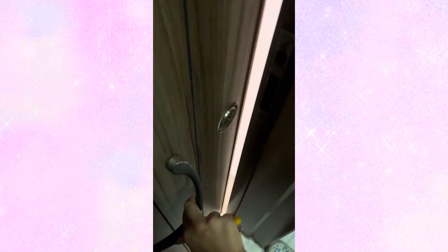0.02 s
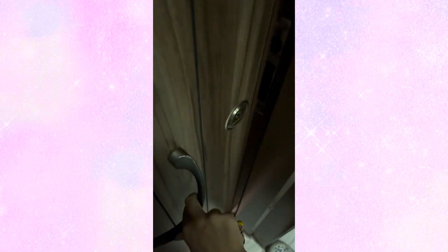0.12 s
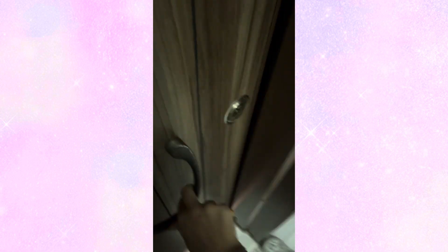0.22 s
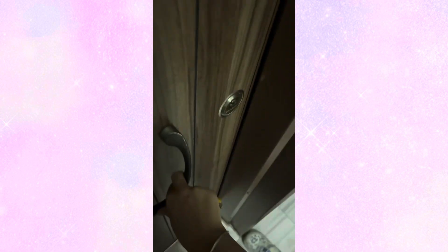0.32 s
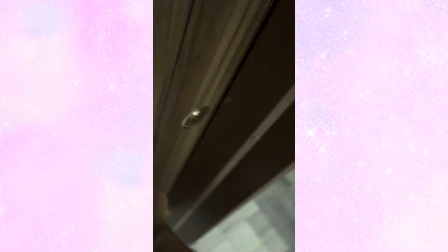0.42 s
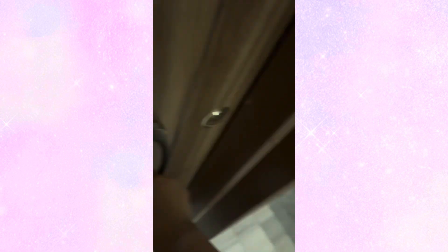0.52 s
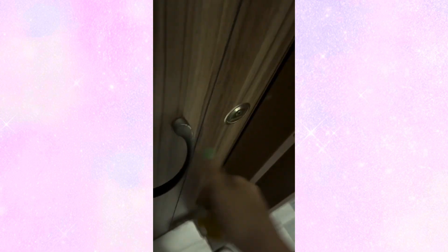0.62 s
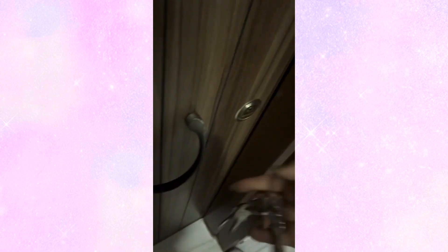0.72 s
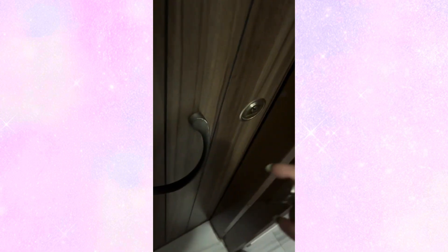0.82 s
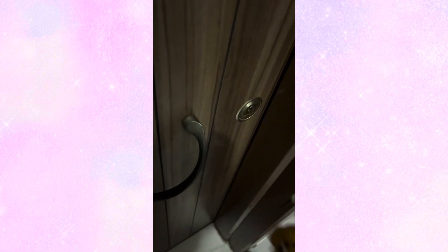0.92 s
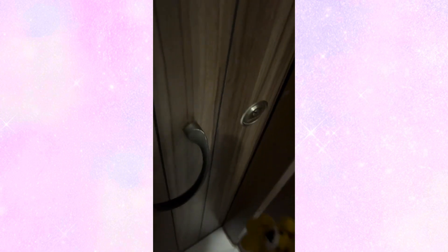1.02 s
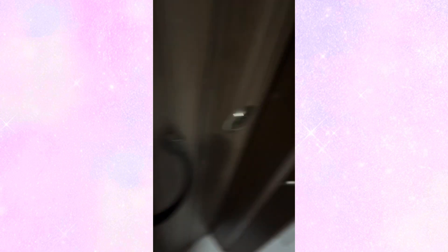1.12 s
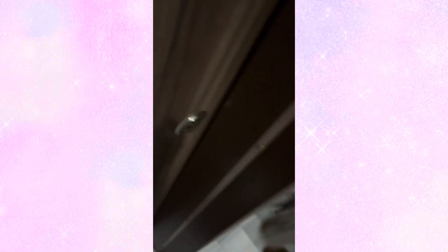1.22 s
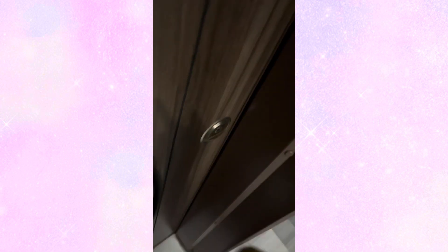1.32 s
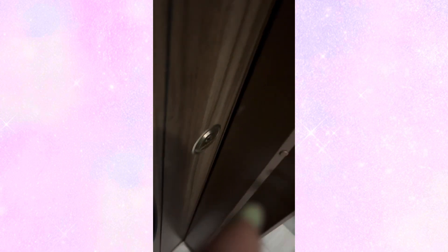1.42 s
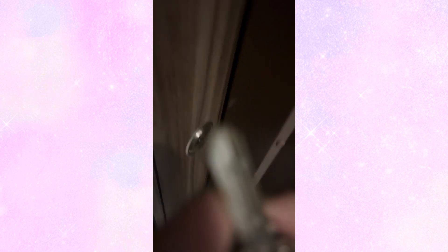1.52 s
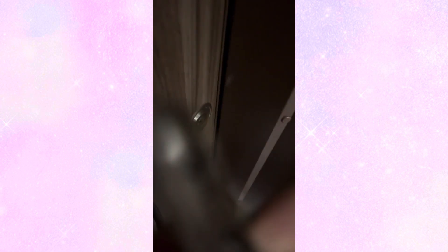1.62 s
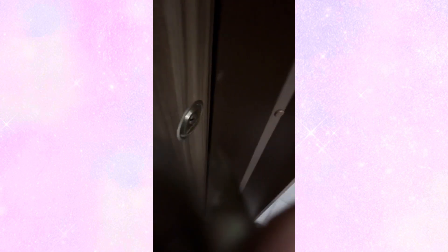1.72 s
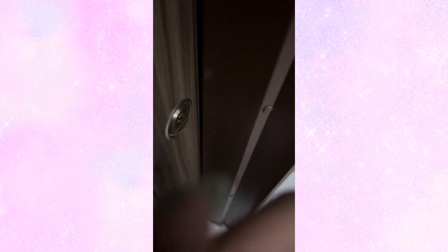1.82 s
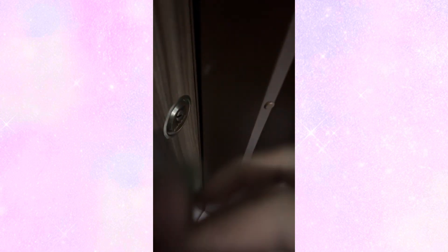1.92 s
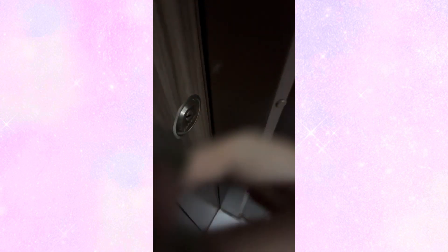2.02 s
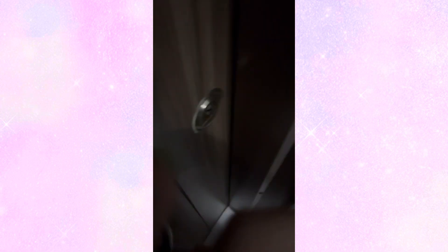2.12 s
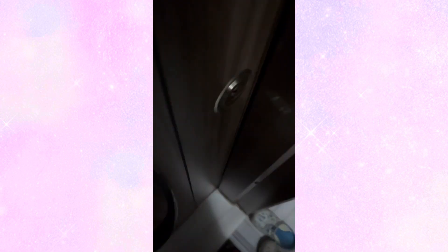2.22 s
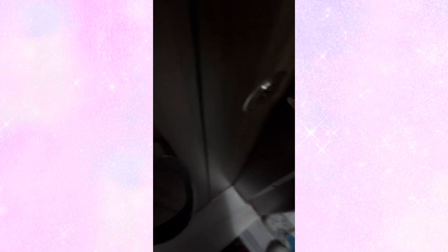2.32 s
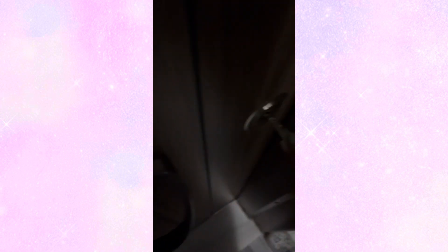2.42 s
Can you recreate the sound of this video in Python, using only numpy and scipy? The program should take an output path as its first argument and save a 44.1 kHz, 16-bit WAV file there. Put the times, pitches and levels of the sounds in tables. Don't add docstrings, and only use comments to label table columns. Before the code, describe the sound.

Door pulled shut in three quick clunking blows, echoing, followed by close keys clinking and ticking

```python
import sys
import numpy as np
from scipy import signal
from scipy.fft import rfft, irfft
from scipy.io import wavfile

SR = 44100
rng = np.random.default_rng(int(sys.argv[2]) if len(sys.argv) > 2 else 0)


def gain_from_db(level_db):
    decades = np.asarray(level_db, float) / 20
    return 10 ** decades


def int16_out(signal):
    q = np.round(np.clip(np.atleast_2d(signal).T, -1, 1) * 32767)
    wavfile.write(sys.argv[1], SR, q.astype(np.int16))


N = 110250
T = np.arange(N) / SR
OPPOSITE = np.array([[1], [-1]])

# frequency in Hz, density in dB per Hz.
AIR_SPECTRUM = [(25, 0), (45, 4), (150, 5.5), (460, -7), (900, -10.5), (2900, -7.5), (6500, -12),
                (16000, -20)]
# centre in seconds, length in seconds, level in dB, centre in Hz.
RUSTLES = [(0.141, 0.1, -53, 1306), (0.877, 0.29, -62, 601.9), (0.92, 0.082, -58, 240),
           (1.101, 0.083, -60.5, 1290), (1.295, 0.21, -61.5, 3400), (1.661, 0.16, -57.5, 3200),
           (1.675, 0.035, -55, 685), (1.733, 0.044, -58.5, 980), (1.961, 0.055, -47, 1300),
           (1.959, 0.092, -56.5, 3500), (2.007, 0.19, -58, 710), (2.06, 0.28, -56.5, 2240)]
# start in seconds, level in dB, pitch in Hz.
CASE_BUMPS = [(0.117, -57.5, 33.7), (0.655, -42, 128), (0.768, -55.5, 48.6), (1.03, -55, 72.7),
              (1.257, -53, 87), (1.27, -49, 70.0), (1.298, -49, 57.3), (1.368, -64, 32.5),
              (1.697, -52.5, 96), (1.823, -54, 91.5), (1.92, -45, 117), (1.928, -32, 85), (1.94, -41, 80),
              (1.996, -38.5, 61.6), (2.03, -51, 32.8), (2.067, -54.5, 72), (2.119, -54.5, 64),
              (2.288, -72, 119)]

# time in seconds, level in dB, scrape before it in seconds,
# rattle t60 in seconds, panel push in dB.
BLOWS = [
    (0.2107, -11, 0.026, 0.044, -11.5),
    (0.2795, -6, 0.00027, 0.062, -11),
    (0.403, -9.5, 0.032, 0.092, -12.5),
    (2.4426, -25.5, 0.0011, 0.025, -32.5),
]
# frequency in Hz, density in dB per Hz.
LATCH_SPECTRUM = [(240, -13), (450, -5.5), (2000, -7), (3300, -6.5), (6000, -11), (8400, -18),
                  (12500, -16.5), (16500, -34.5)]
# frequency in Hz, level in dB, t60 in seconds.
LATCH_RINGS = [(3278, -1.5, 0.046), (976, -8, 0.042), (1500, -10, 0.058), (950, -3, 0.015)]
# time in seconds, frequency in Hz, level in dB, t60 in seconds.
METAL_CRACKS = [(.2003, 4560, -23, 0.016), (.2065, 3257, -14.5, 0.027), (.2115, 2450, -15.5, 0.028),
                (.216, 1134, -14.5, 0.017), (.2815, 920, -13, 0.024), (.288, 4570, -22, .015),
                (.385, 3120, -30, 0.013), (.4018, 3580, -17, 0.0063), (.4035, 1500, -7, 0.012),
                (.4045, 4930, -11, 0.0089), (.4088, 480, -14.5, .008), (2.434, 2310, -43, 0.024),
                (2.4428, 2330, -21, 0.0095), (2.4432, 915, -20, 0.01), (2.4436, 3470, -30.5, 0.014),
                (2.4475, 1280, -25.5, 0.014), (2.452, 3200, -34, .01)]
# frequency in Hz, level in dB, t60 in seconds.
PANEL_MODES = [(206, -6, 0.18), (248.8, -2.5, 0.4), (265, -0.5, 0.27), (282, -11, 0.18), (293.6, -8, 0.48),
               (320, -5.5, 0.11), (341.4, -2.5, 0.23), (394, -8.5, 0.069), (432.3, -4.5, 0.16),
               (508, -9.5, 0.067), (650, -10, 0.099), (720, -11, 0.11)]
# frequency in Hz, level in dB, t60 in seconds.
FRAME_MODES = [(48.6, -23, 0.64), (70, -11, 0.22), (99, -10, 0.31), (124, -4, 0.34), (141, -11, 0.15),
               (178, -14.5, 1)]
# frequency in Hz, level in dB, t60 in seconds.
LEAN_MODES = [(99, -25, 0.31), (128, -6, 0.49), (182, 6, 0.15), (212, -7, 0.066), (267.3, 7.5, 0.12),
              (340, -13, 0.073), (471, -16, 0.79)]

# frequency in Hz, t60 in seconds.
HALL_T60 = [(60, 0.95), (300, 0.93), (1000, 1), (3500, 0.99), (8000, 0.44), (15000, 0.16)]
# frequency in Hz, level in dB, t60 in seconds.
STANDING_WAVES = [(149.7, -30.5, 0.85), (227.8, -39.5, 1.53), (252.3, -36, 0.82), (275.3, -33, 1.12)]

# start in seconds, level in dB, long key share from 0 to 1, contact in seconds.
CHINKS = [(0.637, -44.5, 0.9, 0.034), (0.771, -36.5, 0.66, 0.023), (0.6568, -48.5, 0.4, .01),
          (0.8255, -35, 0.2, 0.002), (0.838, -44, 0.4, 0.0033), (1.0509, -35.5, 0.38, 0.0014),
          (1.07, -49, 0.25, 0.003), (.9, -58, 0.34, 0.031), (1.131, -53.5, 0.6, 0.078),
          (1.2, -54, 0.8, 0.047), (1.2595, -52.5, 0.2, .002), (1.294, -52.5, 0.65, .006),
          (1.5756, -55, 0.05, .005), (1.28, -44.5, 0.73, .03), (1.3381, -52, 0, 0.0064),
          (1.4756, -40, 0.74, 0.0054), (1.59, -43, 1, 0.009), (1.9082, -49.5, 0.8, 0.0086),
          (1.972, -27, 1, 0.017), (1.9988, -23, 0.6, 0.003), (2.008, -34, 0.8, .008),
          (2.019, -31, 0.4, 0.008), (2.0654, -24.5, 0.3, 0.006), (2.098, -37.5, 0.54, 0.0075),
          (2.1438, -34, 0.18, 0.011), (2.177, -26.5, 0.4, 0.0067), (2.196, -33, 0.7, 0.003),
          (2.215, -45, 0.9, 0.004), (2.236, -29, 0.2, 0.004), (2.287, -54, 0.1, 0.0087)]
# time in seconds, level in dB, contact in seconds.
TICKS = [(0.8265, -26.5, 0.009), (.839, -23.5, 0.0047), (0.97, -27, 0.0041), (1.0498, -51, 0.0014),
         (1.2595, -28, 0.0025), (1.3909, -29.5, 0.0088), (1.4741, -25, 0.0019), (1.5247, -37.5, 0.0042),
         (1.7299, -37.5, 0.0028), (1.8713, -31.5, 0.003), (1.899, -32, 0.0033), (1.882, -40.5, .015),
         (1.953, -41, 0.0095), (1.9298, -23, 0.0038), (1.977, -20.5, 0.0046), (1.9974, -13, 0.0013),
         (1.9718, -30, .004), (2.0655, -30, 0.0051), (2.1832, -29.5, 0.044), (2.2337, -18, 0.0011),
         (2.237, -22, 0.011), (2.288, -32, 0.002), (1.598, -28, 0.0027)]
# frequency in Hz, density in dB per Hz.
TICK_SPECTRUM = [(1000, -21), (3000, -16), (5000, -6.5), (9000, -8.5), (12500, 3.5), (15500, -7),
                 (17000, -16)]
# frequency in Hz, level in dB, t60 in seconds.
LONG_KEY_MODES = [(2164, -19, .06), (5109, -20, .1), (6514, -8, .11), (8845, -10, .12), (9150, -11, .08),
                  (10890, 2, .11), (13625, -4, .09), (14350, 7, .11)]
# frequency in Hz, level in dB, t60 in seconds.
SHORT_KEY_MODES = [(6560, -10, .06), (7615, -12, .09), (11650, 4, .06), (11750, -1, .05), (12400, -6, .04),
                   (13650, -8, .05), (14600, -3, .05), (15345, 2, .07)]
# time in seconds,
# loss in dB.
GRIPS = [(.7, 12), (.88, 4), (.965, 15), (1.085, 10), (1.32, 11), (1.39, 12), (1.5, 10), (1.64, 16),
         (1.925, 10), (2.031, -6.5), (2.11, -7), (2.165, 22), (2.201, 16)]

# frequency in Hz, width in Hz, gain in dB.
PORT_DIPS = [(5740, 180, -3.5), (9990, 320, -9), (14700, 180, -9.5)]


def curve(table, hz):
    table = np.array(table)
    return np.interp(np.log(hz + 1), np.log(table[:, 0]), table[:, 1])


def unit(x):
    return x / np.sqrt(np.mean(x ** 2))


def colour(x, table):
    ceps = irfft(np.log(gain_from_db(curve(table, np.linspace(0, SR / 2, 2049)))))
    ceps[1:2048] *= 2
    ceps[2049:] = 0
    h = irfft(np.exp(rfft(ceps)))
    return signal.fftconvolve(x, h / np.sqrt(np.sum(h ** 2)))[:N]


def butter(x, order, hz, kind):
    return signal.sosfilt(signal.butter(order, hz, kind, fs=SR, output="sos"), x)


def ring(x, hz, db, t60):
    pole = np.exp((2j * np.pi * hz - np.log(1000) / t60) / SR)
    return gain_from_db(db) * signal.lfilter([1], [1, -pole], x).imag


def burst(at, rise, t60):
    swell = (T - at) / max(rise, 1e-4) * 4.45
    decay = (at - T) / max(t60, 1e-3) * np.log(1000)
    return np.exp(np.where(T < at, swell, decay))


def grit(db):
    grains = np.repeat(rng.exponential(size=N // 16 + 1), 16)[:N]
    return unit(rng.standard_normal(N) * gain_from_db(db * grains))


def kicks():
    return np.sign(rng.standard_normal(N))


def background():
    mid, side = (colour(rng.standard_normal(N), AIR_SPECTRUM) for _ in range(2))
    side = butter(side, 1, [300, 4000], "band")
    out = gain_from_db(-61.5) * (mid + 1.4 * side * OPPOSITE)
    for s, length, db, hz in RUSTLES:
        spectrum = [(hz / 4, -18), (hz, 0), (hz * 3, -14), (20000, -60)]
        mid, side = (colour(grit(1.6), spectrum) for _ in range(2))
        swell = np.exp(-(2 * (T - s) / length) ** 2)
        out = out + gain_from_db(db) * swell * (mid + 1.5 * side * OPPOSITE)
    return out


def handling():
    thumps = 0
    for s, db, hz in CASE_BUMPS:
        envelope = burst(s + .5 / hz, .5 / hz, 2 * 0.52 / hz)
        thumps = thumps + gain_from_db(db + 12.5) * np.sin(2 * np.pi * hz * (T - s)) * envelope
    return thumps


def door():
    envelopes = [gain_from_db(db) * burst(s, scrape, t60) for s, db, scrape, t60, _ in BLOWS]
    rattles = grit(1.41) * np.array(envelopes)
    latch = .5 * colour(rattles.sum(axis=0), LATCH_SPECTRUM)
    latch = latch + 0.033 * sum(ring(x, *mode) for x, mode in zip(rattles, LATCH_RINGS))
    for s, hz, db, t60 in METAL_CRACKS:
        click = 1. * (np.arange(N) == int(s * SR))
        latch = latch + ring(click, hz, db, t60)

    rise_s, push_s = 0.0047, 0.019
    push = [gain_from_db(db) * burst(s + rise_s, rise_s, push_s) for s, _, _, _, db in BLOWS]
    seat = push[2] + gain_from_db(-16.5) * (push[0] + push[1])
    lean = gain_from_db(-29.5) * burst(2.384, 0.013, 0.055)
    boom = 0
    for force, modes in [(sum(push), PANEL_MODES), (seat, FRAME_MODES), (lean, LEAN_MODES)]:
        boom = boom + sum(ring(force * kicks(), *mode) for mode in modes)
    return latch + gain_from_db(-29.5) * boom


def walls(x):
    length_s, echoes = .04, 50
    taps = np.zeros((2, int(length_s * SR) + 1))
    for port in taps:
        at = rng.random(echoes)
        port[(at * length_s * SR).astype(int)] = rng.standard_normal(echoes) * gain_from_db(-20 * at) / 3
    return signal.fftconvolve(x[None], butter(taps, 1, 251, "high"), axes=1)[:, :N]


def hall(x):
    t, tail = T[:N // 2], 0
    for hz in 44 * 2. ** np.arange(9):
        noise = rng.standard_normal((2, len(t)))
        mid, side = butter(noise, 2, [hz / 2 ** .5, min(hz * 2 ** .5, 20000)], "band")
        width = min(hz / 700, 1) ** 0.77
        tail = tail + (mid + width * side * OPPOSITE) * gain_from_db(-60 * t / curve(HALL_T60, hz))
    onset_s = .006
    tail = tail * (1 - np.exp(-(t / onset_s) ** 2))
    return signal.fftconvolve(x[None], tail / np.sqrt(np.sum(tail ** 2) / 2), axes=1)[:, :N]


def stairwell():
    swell_s, waves = 0.028, 0
    for hz, db, t60 in STANDING_WAVES:
        envelope = burst(BLOWS[2][0] + swell_s, swell_s, t60)
        waves = waves + gain_from_db(db) * np.sin(2 * np.pi * hz * T) * envelope
    return waves


def ringing_keys():
    touch = []
    for s, db, _, contact in CHINKS:
        knock = burst(s + contact / 2, contact, 4 * contact) / np.sqrt(contact * SR)
        chatter = gain_from_db(-36) * burst(s, .02, .2)
        touch.append(gain_from_db(db) * (knock + chatter))
    touch = np.array(touch)

    share = np.clip(np.array(CHINKS)[:, 2], 0, 1)
    low_hz, high_hz = 4800, 15900
    small_hz = low_hz + (high_hz - low_hz) * ((np.arange(24) + rng.random(24)) / 24) ** .8
    parts = [(share, mode) for mode in LONG_KEY_MODES]
    parts += [(1 - share, mode) for mode in SHORT_KEY_MODES]
    parts += [(1, (hz, -11 + .5 * curve(TICK_SPECTRUM, hz), 0.038)) for hz in small_hz]
    chance = gain_from_db(2.5 * rng.standard_normal((len(CHINKS), len(parts))))

    grip_s = 0.0073
    grip = gain_from_db(sum(db * np.clip((T - s) / grip_s, 0, 1) for s, db in GRIPS))
    rings = 0
    for k, (weight, mode) in enumerate(parts):
        turns = np.interp(T, np.arange(101) / 40, rng.standard_normal(101))
        force = (weight * chance[:, k]) @ touch * grip * kicks()
        rings = rings + gain_from_db(3.5 * turns) * ring(force, *mode) / grip
    fist = gain_from_db(-50 * np.clip((T - 2.211) / 0.016, 0, 1))
    return butter(rings, 2, 2000, "high") * fist


def damped_keys():
    envelope = sum(gain_from_db(db) * burst(s, 0.76 * contact, 3 * contact) for s, db, contact in TICKS)
    return .5 * colour(grit(1) * envelope, TICK_SPECTRUM)


def scene():
    slam = door()
    bunch = ringing_keys() + damped_keys()
    early = walls(gain_from_db(-6.5) * slam + gain_from_db(-6) * bunch)
    late = hall(gain_from_db(-9.5) * slam + gain_from_db(-15.5) * bunch)
    case = handling() * gain_from_db(1.5 * OPPOSITE)
    return slam + bunch + early + late + case + stairwell() + background()


def top_cut(x):
    return signal.sosfilt(signal.butter(12, 16650, fs=SR, output="sos"), x)


def record(dry):
    hz = np.fft.rfftfreq(N, 1 / SR)
    treble_lag_s, bass_lag_s, split_hz = .000235, .0001, 4000
    treble = treble_lag_s * np.maximum(hz - split_hz, 0)
    bass = bass_lag_s * np.clip(np.minimum(hz, split_hz - hz), 0, None)
    turn = np.exp(1j * np.pi * (treble + bass))
    db = -23 * np.clip((hz - 15900) / 300, 0, 1)
    db = db + sum(dip * np.exp(-((hz - at) / width) ** 2) for at, width, dip in PORT_DIPS)
    heard = irfft(rfft(dry) * gain_from_db(db) * np.array([turn, 1 / turn]), N)
    return top_cut(heard)


dry = scene()
out = record(dry)
int16_out(out)
```